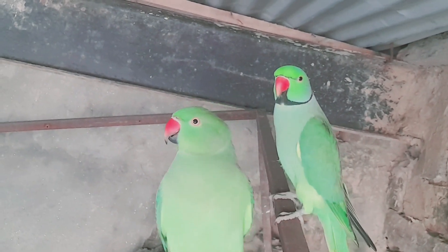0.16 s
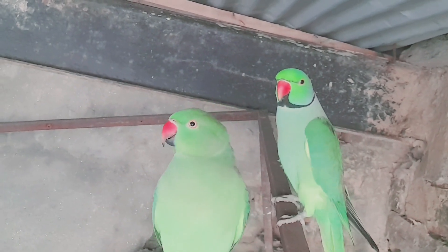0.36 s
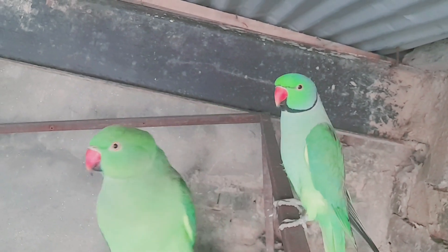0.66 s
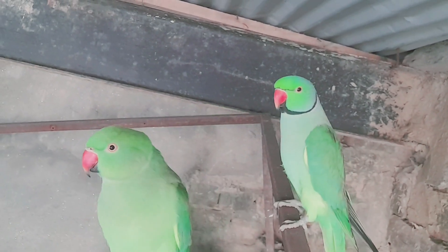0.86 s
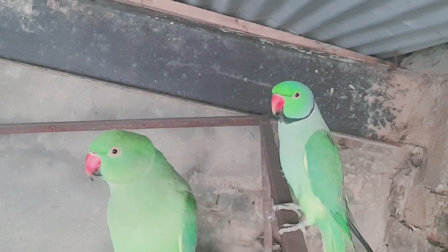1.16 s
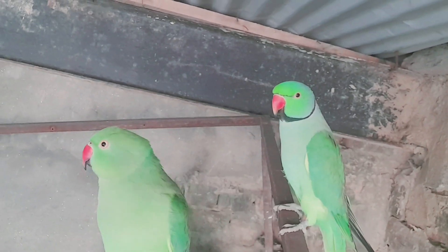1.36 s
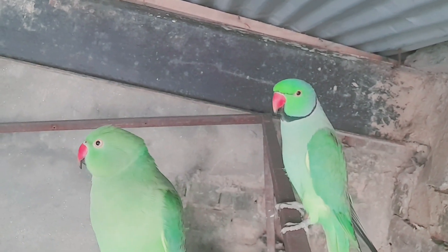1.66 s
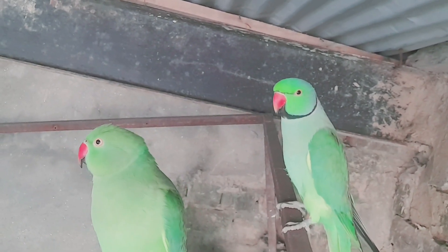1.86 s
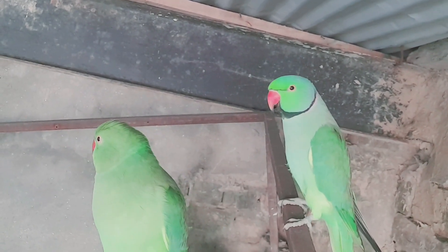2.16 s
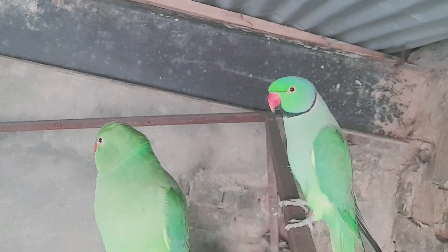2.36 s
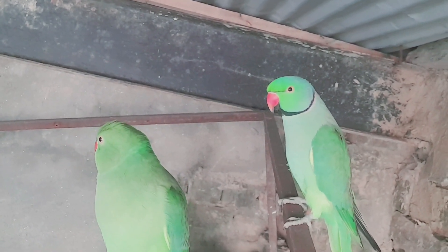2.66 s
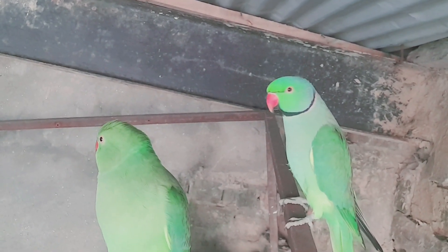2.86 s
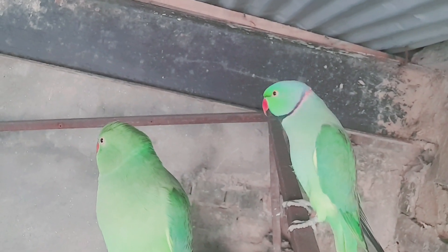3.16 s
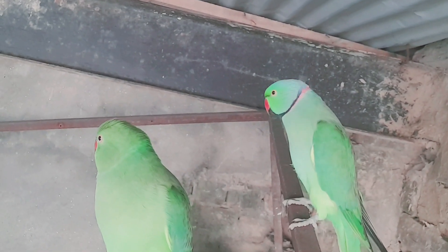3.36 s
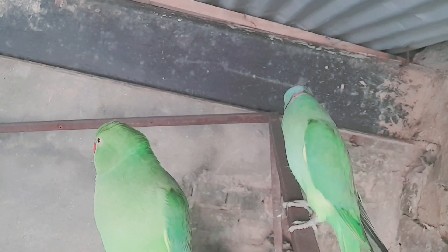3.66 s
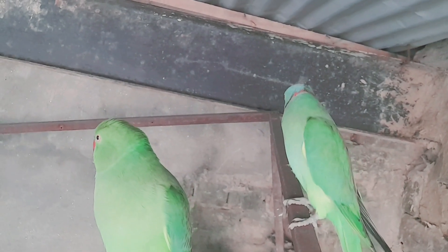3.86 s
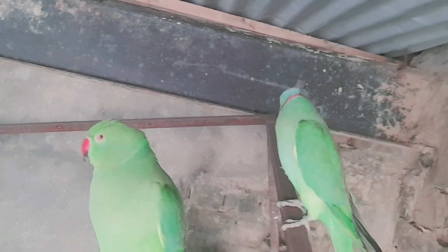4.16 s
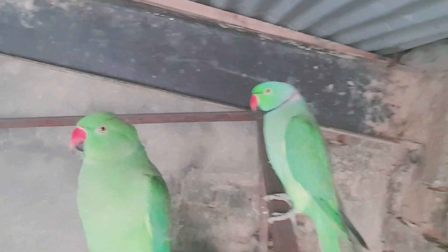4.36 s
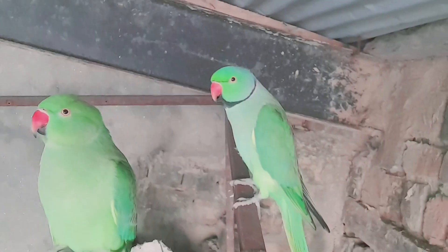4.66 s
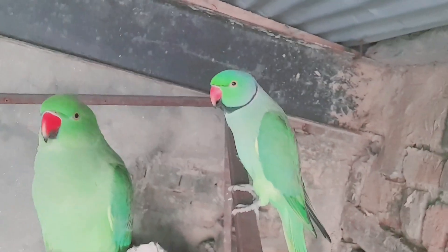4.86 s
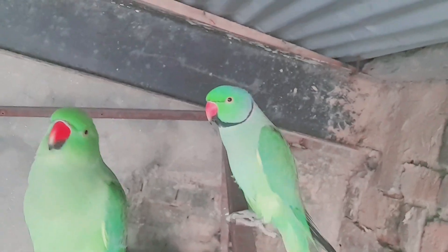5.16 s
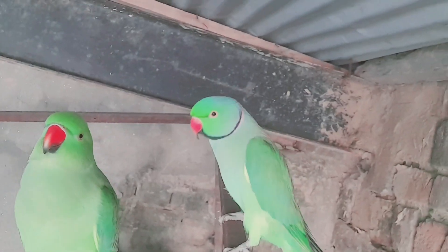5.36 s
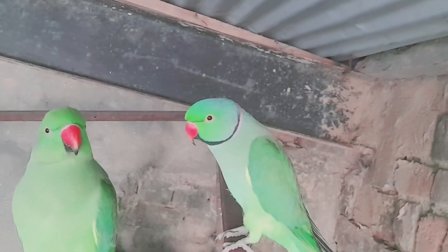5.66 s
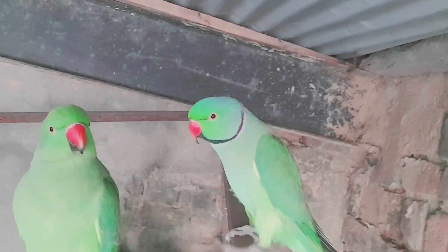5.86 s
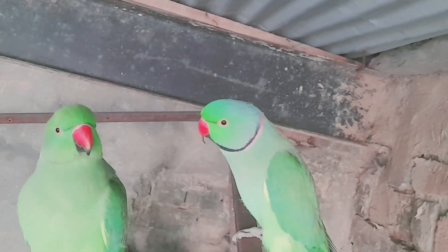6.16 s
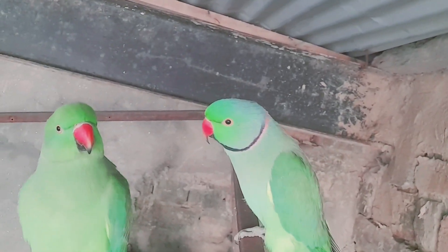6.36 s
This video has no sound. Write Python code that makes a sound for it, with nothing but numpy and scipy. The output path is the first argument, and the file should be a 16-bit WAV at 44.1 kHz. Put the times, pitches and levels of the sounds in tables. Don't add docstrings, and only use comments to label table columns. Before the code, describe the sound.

Two parakeets call in a brick enclosure: piped chirps, a raspy growl, a rising squawk breaking into piercing whistles, then swooping whistles over faint rumble.

```python
import sys
import numpy as np
from scipy import signal
from scipy.fft import rfft, irfft, next_fast_len
from scipy.io import wavfile
from scipy.ndimage import uniform_filter1d, map_coordinates

SR = 44100
rng = np.random.default_rng(int(sys.argv[2]) if len(sys.argv) > 2 else 0)


def field_ratio(decibels):
    return 10 ** (np.asarray(decibels, dtype=float) / 20)


def transcribe(signal):
    frames = np.atleast_2d(signal).T
    limited = np.clip(frames, -1, 1)
    pcm = np.round(limited * 32767).astype(np.int16)
    wavfile.write(sys.argv[1], SR, pcm)


N = 286650


def unit(x):
    return x / np.sqrt(np.mean(x ** 2) + 1e-20)


def along(points, hz):
    f, v = np.transpose(points)
    return np.interp(np.log(hz + 1), np.log(f + 1), v)


def filtered(x, response):
    m = next_fast_len(N + 8192)
    return irfft(rfft(x, m) * response(np.fft.rfftfreq(m, 1 / SR)), m)[..., :N]


def noise(spectrum):
    return unit(filtered(rng.standard_normal(N), lambda hz: field_ratio(along(spectrum, hz))))


def patchy(x, depth_db):
    z = signal.stft(x, nperseg=256)[2]
    field = uniform_filter1d(rng.standard_normal(z.shape), size=5, axis=0)
    field = uniform_filter1d(field, size=10, axis=1)
    return unit(signal.istft(z * field_ratio(depth_db * unit(field)), nperseg=256)[1][:N])


def wobble(n, rate):
    knots = rng.standard_normal(int(n * rate / SR) + 4)
    return map_coordinates(knots, [np.arange(n) * rate / SR])


def span(rows, fade):
    s, *cols = np.transpose(rows)
    at = np.arange(max(0, round(s[0] * SR)), min(N, round(s[-1] * SR)))
    t = at / SR
    since_start = t - s[0] + (s[0] == 0)
    gate = np.clip(np.minimum(since_start, s[-1] - t) / fade, 0, 1)
    return at, gate, [uniform_filter1d(np.interp(t, s, c), size=700, mode="nearest") for c in cols]


def partials(pitch, levels_db, hoarse):
    phase = 2 * np.pi * np.cumsum(pitch) / SR + hoarse * wobble(len(pitch), 420)
    return sum(np.sqrt(2) * field_ratio(db) * (k * pitch < 15900) * np.sin(k * phase + k * k)
               for k, db in enumerate(levels_db, 1))


def notes(rows, shape):
    return [[(s + share * length, top + drop * (end - top), db + first_db, db + second_db, breath_db)
             for share, drop, first_db, second_db, breath_db in shape]
            for s, length, top, end, db in rows]


# [t/s, level/dB]
RUMBLE = [(0.0, -65), (.55, -65), (1.08, -68.5), (1.34, -75.5), (1.72, -69.5), (2.0, -73), (2.33, -62),
          (2.66, -69.5), (2.9, -56.5), (3.33, -67), (3.8, -68.5), (4.18, -74), (4.34, -61.5), (4.5, -68.5),
          (5.1, -60.5), (5.7, -68.5), (6.35, -69.5), (6.5, -60.5)]
# [f/Hz, level/dB per Hz]
AIR = [(20, -34), (45, -8), (100, 1), (170, -15), (320, -15.5), (600, -24), (1200, -35.5), (2500, -37.5),
       (5000, -43.5), (9000, -40.5), (15600, -57)]
# [f/Hz, likeness]
AIR_ALIKE = [(60, 0.49), (240, 0.7), (950, 0.69), (3770, 0.77), (15000, 0.1)]


def background():
    turn = lambda hz: np.arccos(np.clip(along(AIR_ALIKE, hz), -1, 1)) / 2
    pair = [noise(AIR), noise(AIR)]
    mid, side = filtered(pair, lambda hz: np.array([np.cos(turn(hz)), np.sin(turn(hz))]))
    level_db = np.interp(np.arange(N) / SR, *np.transpose(RUMBLE)) + 2.5 * wobble(N, 11)
    return field_ratio(level_db + 0.5) * np.array([mid + side, mid - side]) * field_ratio([[-2.5], [2.1]])


# [f/Hz, t/s]
WALLS = [(300, 0.21), (2500, 0.2), (6000, 0.22), (14000, 0.17)]
LATE_DB, LATE_T60_S = -32, 0.58


def walls(x):
    hz, t, z = signal.stft(rng.standard_normal((2, SR * 3 // 5)), SR, nperseg=256)
    decay = field_ratio(-60 * t / along(WALLS, hz)[:, None]) + field_ratio(LATE_DB - 60 * t / LATE_T60_S)
    tail = signal.istft(z * decay, SR, nperseg=256)[1]
    tail = tail / np.linalg.norm(tail[0])
    delayed = np.pad(x, (150, 0))[None]
    return signal.fftconvolve(delayed, tail, axes=1)[:, :N] * field_ratio([[-3.5], [2.5]])


# [f/Hz, level/dB]
PORT_DB = [(60, -10), (180, -7.5), (550, -8), (1650, -13), (4970, -18.5), (15000, -11.5)]
# [f/Hz, phase/rad]
PORT_RAD = [(0, -0.5), (2580, 3.5), (3100, 8.5), (8350, 19), (9130, 8), (15200, 28)]


def ports(x, shift_db, turn):
    half = lambda hz: (field_ratio((along(PORT_DB, hz) + shift_db) / 2)
                       * np.exp(.5j * turn * along(PORT_RAD, hz)))
    return filtered(np.array([x, x]), lambda hz: np.array([half(hz), 1 / half(hz)]))


# [t/s, length/s, first f/Hz, last f/Hz, level/dB, loss/dB, hoarseness/rad]
OUTSIDE = [(0, 0.019, 1900, 1890, -42, -2, .4), (0.453, 0.071, 2080, 1158, -53, 2, 0.54),
           (1.202, 0.14, 798, 770, -74.5, 9, 0.48), (1.304, 0.13, 7530, 7390, -89, -3, 0.43),
           (4.44, 0.13, 800, 765, -73.5, 7.5, 0.87), (4.49, 0.09, 2770, 2600, -57, -9, 0.26),
           (5.21, 0.042, 3300, 3220, -42, 1, .3), (5.51, 0.34, 875, 830, -80, 11, .7),
           (5.6, .16, 2100, 2090, -95, 9, .8), (5.66, 0.42, 2880, 2930, -92, 11, .6),
           (6.103, 0.083, 2080, 2280, -68, 1, 0.3), (6.125, 0.24, 640, 570, -76, 9, .9),
           (6.17, 0.14, 1800, 1720, -81.5, 9, 1.3), (6.2, 0.21, 1990, 1900, -90, 0.5, 1.3),
           (6.408, 0.07, 1010, 980, -82, -2.5, 0.41)]


def outside():
    out = np.zeros(N)
    for s, length, first_hz, last_hz, db, loss_db, hoarse in OUTSIDE:
        rows = [(s, first_hz, db), (s + length, last_hz, db - loss_db)]
        at, gate, (pitch, level_db) = span(rows, fade=0.0055)
        out[at] += gate * partials(pitch, [level_db + 5.5 * wobble(len(at), 30)], hoarse)
    return out


# [t/s, peak level/dB, f/Hz]
TAPS = [
    (0.061, -39.5, 740),
    (0.262, -41, 733),
    (0.467, -44, 725),
    (0.671, -48, 720),
]


def taps():
    out, t = np.zeros(N), np.arange(3000) / SR
    envelope = (1 - np.exp(-t / 0.0038)) * field_ratio(-60 * t / 0.021)
    for s, db, hz in TAPS:
        out[round(s * SR):][:len(t)] += field_ratio(db + 26) * envelope * np.sin(2 * np.pi * hz * t)
    return out


# [t/s, level/dB]
THUMP = (2.715, -31)
# [f/Hz, level/dB, time to fall 60 dB t/s]
PANEL = [(66.5, -1.5, 1), (91, -6, 0.99), (167, 0, 0.55), (245, -16.5, 0.26), (323, -24, 0.68)]


def thump():
    start_s, level_db = THUMP
    t = np.clip(np.arange(N) / SR - start_s, 0, None)
    ring = sum(field_ratio(db - 60 * t / t60 + 3.3 * wobble(N, 22)) * np.sin(2 * np.pi * hz * t)
               for hz, db, t60 in PANEL)
    return field_ratio(level_db) * (1 - np.exp(-(t / 0.0028) ** 2)) * ring


# [t/s, level/dB]
HOPS = [
    (4.33, -64),
    (5.51, -48),
    (5.585, -58),
]


def hops():
    t = np.arange(N) / SR
    push = sum(field_ratio(db - 60 * np.clip(t - s, 0, 1) / 0.14) * np.clip((t - s) / 0.0084, 0, 1)
               for s, db in HOPS)
    return push * noise([(40, -18), (150, 7), (400, -14.5), (1000, -31), (3000, -56.5)])


# [t/s, length/s, level/dB]
AIR_SWELLS = [(0.132, 0.205, -49.5), (0.429, 0.19, -46.5), (0.716, 0.14, -50), (1.722, 0.077, -47.5),
              (2.262, 0.085, -50), (3.525, .09, -49), (4.074, 0.06, -65), (4.431, .07, -62),
              (5.296, 0.2, -50.5), (6.406, .2, -73)]
# [f/Hz, level/dB per Hz]
BREATH = [(400, -49), (800, -26.5), (1500, -26.5), (2700, -11), (5000, -19), (7500, -19), (9300, -30.5),
          (12000, -30), (14000, -34.5), (15600, -41.5)]


def air_swells():
    t = np.arange(N) / SR
    swell = sum(field_ratio(db) * np.sin(np.pi * np.clip((t - s) / length, 0, 1)) for s, length, db in AIR_SWELLS)
    return swell * patchy(noise(BREATH), depth_db=10.5)


# [t/s, length/s, level/dB]
WHEEZE = [
    (4.77, .24, -57.5),
    (5.07, .2, -51.5),
    (5.2, 0.27, -58),
]
# [f/Hz, level/dB per Hz]
WHEEZE_COLOUR = [(3000, -20), (6000, -3.5), (9000, 1.5), (12000, -4.5), (15600, -9.5)]


def wheeze():
    t = np.arange(N) / SR
    swell = sum(field_ratio(db) * np.sin(np.pi * np.clip((t - s) / length, 0, 1) ** .6)
                for s, length, db in WHEEZE)
    return swell * patchy(noise(WHEEZE_COLOUR), depth_db=-1.5)


# [t/s, peak level/dB, scrape level/dB, knock level/dB]
CLAWS = [(1.952, -43, 0.5, -27), (2.4926, -37, -10, -32.5), (2.5422, -39, -13.5, -15.5),
         (3.0588, -22, -11.5, -17.5), (3.885, -36, -5, -56), (4.083, -36.5, -2, -52),
         (4.298, -29.5, -29.5, -24.5), (4.4373, -46.5, -14, -24), (6.4398, -68.5, 8.5, -12),
         (6.4642, -59, 3.5, -2.5)]
# [f/Hz, level/dB per Hz]
PERCH = [(500, -25.5), (1400, -22), (2050, 1.5), (2600, -12), (4000, -24), (6000, -34.5)]
# [f/Hz, level/dB per Hz]
SCRAPE = [(2500, -48.5), (4500, -14), (7000, -0.5), (9000, -0.5), (15000, -30.5)]


def claws():
    out, t = np.zeros(N + SR), np.arange(3000) / SR
    perch, scrape = noise(PERCH), noise(SCRAPE)
    for s, db, scrape_db, knock_db in CLAWS:
        at = round(s * SR)
        piece = slice(at - len(t), at)
        tick = field_ratio(-60 * t / 0.14) * perch[piece] + field_ratio(scrape_db - 60 * t / 0.07) * scrape[piece]
        knock = field_ratio(knock_db + 9.5) * (1 - t / 0.00021) * np.exp(-t / .00015)
        out[at:][:len(t)] += field_ratio(db - 11.0) * (tick * (1 - np.exp(-t / 0.0006)) + knock)
    return out[:N]


# [t/s, level/dB]
CREAKS = [(2.5634, -48.5), (2.5825, -48.5), (2.602, -46), (2.63, -45.5)]
# [t/s, level/dB, width/s]
SNAP = (3.0585, -18, .00007)
# [f/Hz, level/dB per Hz]
SCREECH = [(530, -34.5), (900, -23.5), (1050, -29), (2310, -7.5), (2510, -4), (3590, -5.5), (5320, -12.5),
           (8670, -20.5), (12700, -35.5), (15600, -47)]


def small_noises():
    t, air = np.arange(N) / SR, noise(SCREECH)
    puffs = sum(field_ratio(db - 60 * np.clip(t - s, 0, 1) / 0.17) * np.clip((t - s) / 0.0016, 0, 1)
                for s, db in CREAKS)
    snap_s, snap_db, width_s = SNAP
    return puffs * air - field_ratio(snap_db) * np.exp(-((t - snap_s) / width_s) ** 2)


PIPES = [(-.04, 0.12, 3045, 2656, -30.5), (.235, 0.11, 3352, 2923, -30), (3.52, .1, 3497, 3084, -31.5)]
STEPS = [(.52, .095, 3646, 3220, -24.5), (.8, 0.084, 3586, 3233, -24)]
FALLS = [(.08, 0.056, 1878, 1257, -41), (.33, 0.096, 2340, 1626, -37.5), (.6, 0.091, 2436, 1760, -34),
         (.878, 0.068, 2430, 2180, -35), (3.61, 0.084, 2350, 1700, -34), (4.3, 0.056, 2303, 1816, -41.5),
         (4.6, 0.079, 2166, 1687, -40.5)]
CHIPS = [(.24, 0.015, 2480, 2500, -48.5), (0.521, 0.015, 2474, 2410, -39),
         (0.804, 0.019, 2460, 2470, -40.5)]
SWOOPS = [(4.772, .18, 2702, 1939, -34), (5.075, .2, 2712, 1665, -32.5)]
# [share of length, share of drop, 1st partial level/dB, 2nd partial level/dB, breath under voice level/dB]
PIPE_SHAPE = [(0, 0.3, -2, -43, -2.5), (.35, 0.077, 4, -30, -28.5), (.7, 0.42, -3.5, -22, -29),
              (1, 1, 3, -20.5, -7.5)]
STEP_SHAPE = [(0, .6, -16, -43.5, 9), (.3, 0.11, -16, -44.5, -16), (0.618, 0.19, -9.5, -27.5, -22),
              (.78, 0.86, -1.5, -25.5, -19), (1, 0.95, -7.5, -21.5, -27.5)]
FALL_SHAPE = [(0, 0.0043, -5, 7.5, -13.5), (0.398, .12, -12, -5.5, -4), (1.002, 1, -14, -1, 3)]
SWOOP_SHAPE = [(0, 0.85, -27, 9.5, 14.5), (.09, 0.026, -1.5, -13, -15.5), (.45, 0.06, -1, -2, -25),
               (.7, .38, -8, 3.5, -24), (0.998, 1, -14.5, 1, -6)]
# [t/s, f/Hz, level/dB]
SONG = [
    [(4.75, 2087, -38), (4.8, 2110, -39.5), (4.854, 2147, -35.5), (4.89, 2230, -35.5), (4.914, 2292, -26),
     (4.968, 2289, -29.5), (5.005, 2280, -42.5)],
    [(4.995, 2276, -40), (5.086, 2521, -33), (5.15, 2681, -33.5), (5.22, 2590, -35), (5.288, 2477, -36.5),
     (5.334, 2384, -46.5), (5.384, 2493, -36), (5.42, 2808, -35.5), (5.445, 2800, -65.5)],
    [(4.16, 1400, -84.5), (4.2, 1650, -51.5), (4.24, 2450, -52.5), (4.255, 2900, -39), (4.285, 3260, -34.5),
     (4.31, 3230, -38.5), (4.38, 3202, -52.5)],
    [(4.452, 3200, -48), (4.47, 3200, -38), (4.52, 3040, -40.5), (4.57, 2920, -30), (4.61, 2870, -46),
     (4.72, 2900, -55)],
]
# [2nd partial level/dB, breath under voice level/dB]
SONG_VOICE = [(-15.5, -13.5), (-31, -14), (-24.5, -14), (-20.5, -20.5)]


def far_bird():
    out = np.zeros(N)
    air = patchy(noise(SCREECH), depth_db=3.5) * field_ratio(2 * wobble(N, 120) + wobble(N, 30))
    song = [[(s, hz, db, db + second_db, breath_db) for s, hz, db in call]
            for call, (second_db, breath_db) in zip(SONG, SONG_VOICE)]
    clear = notes(PIPES, PIPE_SHAPE) + notes(STEPS, STEP_SHAPE) + song
    rough = notes(FALLS + CHIPS, FALL_SHAPE) + notes(SWOOPS, SWOOP_SHAPE)
    kinds = ((clear, .12, .12, (-8, -12, -20)), (rough, .2, .55, (-20, -25, -38)))
    for calls, first_hoarse, last_hoarse, over_db in kinds:
        for call in calls:
            fade = min(.016, (call[-1][0] - call[0][0]) / 4)
            at, gate, (pitch, first_db, second_db, breath_db) = span(call, fade)
            levels_db = [first_db, second_db] + [second_db + db for db in over_db]
            voice = partials(pitch, levels_db, np.linspace(first_hoarse, last_hoarse, len(at)))
            breath = field_ratio(np.maximum(first_db, second_db) + breath_db) * gate * air[at]
            throb = field_ratio(3.0 * wobble(len(at), 70))
            out[at] += gate * throb * (voice + breath)
    return out


# [t/s, level/dB, bottom f/Hz, top f/Hz]
GROWL = [(.865, -41.5, 750, 1182), (.92, -37.5, 794, 1343), (.955, -24.5, 835, 1413),
         (1.0, -21, 850.6, 1413), (1.06, -20.5, 939, 1455), (1.15, -23, 1004, 1494),
         (1.175, -36.5, 1097, 1503)]
# [f/Hz, level/dB per Hz]
RASP = [(500, -23.5), (1000, 0.5), (3000, 6.5), (4500, -2), (7000, -6.5), (8500, -47.5), (12000, -16.5),
        (15600, -19.5)]
SWINGS_HZ = 118
DWELL = 1.25
THROB_DB, THROB_FROM_S, THROB_RISE_S = 11, 0.96, 0.041


def growl():
    out = np.zeros(N)
    at, gate, (level_db, bottom, top) = span(GROWL, fade=0.015)
    throb_db = -2.5 + (THROB_DB - 3.0) * np.clip((at / SR - THROB_FROM_S) / THROB_RISE_S, 0, 1)
    turns = np.cumsum(SWINGS_HZ * (1 + .018 * wobble(len(at), 30))) / SR
    swing = np.tanh(DWELL * (1 - np.cos(2 * np.pi * turns))) / np.tanh(2 * DWELL)
    levels_db = [db + 0.47 * wobble(len(at), 110)
                 for db in (-13.5, -2.0, -22.0, -24.5, -33, -44.0, -49.0, -35.0, -33.5)]
    tone = partials(bottom + (top - bottom) * swing, levels_db, .15)
    puff = field_ratio(-12) * noise(RASP)[at]
    swing_db = 2 * throb_db * (np.sin(np.pi * turns) ** 2 - 0.5955)
    out[at] = gate * field_ratio(level_db + swing_db) * (tone + puff)
    return out


# [t/s, f/Hz, effort level/dB]
ARCS = [
    [(1.48, 806, -64), (1.526, 769, -56), (1.558, 763, -44.5), (1.63, 807.4, -32.5), (1.698, 839, -29.5),
     (1.728, 818.3, -30.5), (1.74, 762, -32.5), (1.755, 553, -50.5), (1.77, 395, -49)],
    [(2.02, 1457, -49), (2.06, 1386, -44), (2.09, 1520, -40.5), (2.14, 1983, -30), (2.18, 2120, -26),
     (2.2, 2091, -25), (2.214, 1900, -31.5)],
    [(2.212, 1815, -22.5), (2.272, 1215, -28), (2.3, 591, -49)],
    [(3.06, 643, -50), (3.085, 803, -42.5), (3.11, 1094, -41), (3.16, 1195, -38.5), (3.2, 1220, -29.5),
     (3.26, 1237, -27), (3.305, 1180, -30), (3.318, 760, -27.5), (3.34, 612, -43)],
]
# [t/s, f/Hz, effort level/dB]
RISES = [
    [(2.55, 495.7, -65), (2.64, 630, -43), (2.7, 678, -33), (2.762, 740.8, -31.5), (2.792, 845.6, -30),
     (2.862, 853.5, -29), (2.893, 1050, -28), (2.942, 1297, -26), (2.984, 1805, -24.5), (3.0, 1800, -29)],
    [(4.14, 736, -66), (4.17, 758, -57), (4.21, 780, -56)],
]
# [t/s, f/Hz, effort level/dB]
HIGH = [
    [(2.993, 2426, -14.5), (3.014, 2430, -31), (3.03, 2479, -19), (3.048, 2505, -33), (3.09, 2545, -36)],
    [(3.325, 2415, -26.5), (3.395, 2463, -18), (3.439, 2400, -25.5), (3.465, 2389, -18.5)],
    [(3.45, 1844, -30.5), (3.508, 1787, -26), (3.534, 1701, -29), (3.56, 1064, -30.5),
     (3.595, 436.6, -43.5)],
]
# [2nd
# partial level/dB, 3rd partial level/dB, upper partials level/dB, gain per upper partial/dB, growth of 3rd and
# upper partials/dB per dB of effort]
CLOSURE = [(-1, -9, 5, 1, 0.6), (-13, 5, -11, 1.5, 1.66), (-7, -5.5, -5, 3, 0.5), (-6, -6, -5, 1.35, 0.66),
           (-2.5, -1.5, -5, 1.5, 0.46), (3, -2.5, 6.5, 2, 2), (-6.5, -14.5, -10.5, -1, 0),
           (0.5, -9, -11, 4.5, 0.23), (9.5, -4.5, -6, 3, 0)]
# [gain of partials above the throat level/dB, breath level/dB]
SHEEN = [(18, 3), (12, 5.5), (-18, 1), (-10.5, 3.5), (-4.5, 4.5), (0, -2), (-10, 3.5), (8.5, -3.5),
         (-22, -1)]
HALVES_DB = [-45.5, -52.5, -60.5, -52.5, -41, -40, -60.5, -49, -60]
SECOND_GROWS = [0, 0.8, 0, 0.01, 0.06, 0, 0, 0.02, 0.2]
# [t/s, flutter depth 0-1, hoarseness/rad]
STRAIN = [(1.6, 0, .02), (1.72, 0, .045), (1.75, 0, .2), (2.02, 0, .01), (2.2, 0, .035), (2.26, 0, .075),
          (2.3, 0, .2), (2.55, .6, .24), (2.7, .5, .2), (2.9, .45, .2), (2.95, .25, .14), (3.0, 0, .11),
          (3.09, 0, .05), (3.16, .05, .02), (3.2, .85, .14), (3.31, .85, .17), (3.325, .3, .2),
          (3.34, 0, .13), (3.52, 0, .12), (3.55, .5, .18), (4.14, .4, .18)]
# [f/Hz, level/dB]
MOUTH = [(500, -17.5), (900, -16.5), (1500, -10.5), (2000, 0.5), (2500, -0.5), (3000, -1), (3600, -8),
         (4300, -13.5), (5400, -10.5), (7500, -6.5)]
# [f/Hz, level/dB]
GAPE = [(500, -18.5), (900, -14), (1300, -17), (1750, -10.5), (2050, 2.5), (2550, 3), (3000, -6),
        (3600, -5), (4300, -15.5), (5400, -18.5)]
# [f/Hz, level under voice/dB]
THROAT = [(1500, 25), (2500, 7.5), (3300, -7), (4200, -6), (5000, -3.5), (5800, -12.5), (6600, -4),
          (7600, -13.5), (8800, -21), (12000, -31), (15500, -33)]
# [t/s, f/Hz, level/dB]
WHISTLE = [(4.563, 1435, -51), (4.637, 1445, -40), (4.743, 1131, -36.5), (4.765, 1035, -32.5),
           (4.833, 1041, -35), (4.875, 1235, -31), (4.915, 1390, -30), (4.978, 1780, -16.5),
           (4.995, 1700, -46.5)]
SHEEN_HZ = 8000
BROKEN_DB = 8.0


def near_bird():
    out, air = np.zeros(N), patchy(noise(BREATH), depth_db=2.0)
    strain_s, *strain = np.transpose(STRAIN)
    for call, closure, (sheen_db, air_db), half_db, second_grows in zip(
            ARCS + RISES + HIGH, CLOSURE, SHEEN, HALVES_DB, SECOND_GROWS):
        second_db, third_db, rich_db, beak_db, third_grows = closure
        at, gate, (pitch, effort_db) = span(call, fade=.005)
        flutter, hoarse = (np.interp(at / SR, strain_s, c) for c in strain)
        beat = 2 * np.pi * np.cumsum(120 + 4 * wobble(len(at), 40)) / SR
        blow_db = effort_db - effort_db.max()
        growth_db = third_grows * blow_db
        long_squawk = call is RISES[0]

        closing_db = (0, second_db + second_grows * blow_db, third_db + growth_db)
        low_db = [along(GAPE if long_squawk else MOUTH, k * pitch) + db
                  for k, db in enumerate(closing_db, 1)]
        total_db = 10 * np.log10(sum(field_ratio(db) ** 2 for db in low_db))
        low_db = [effort_db + db - total_db + BROKEN_DB * long_squawk * flutter * wobble(len(at), 45)
                  for db in low_db]

        upper_db = []
        for k in range(4, 22):
            gloss_db = sheen_db * np.clip(2 * (k * pitch / SHEEN_HZ - 1), 0, 1)
            slope_db = (beak_db + 0.22 * (effort_db + 19)) * (k - 3)
            throat_db = along(THROAT, k * pitch)
            upper_db.append(effort_db + rich_db + growth_db + throat_db + gloss_db + slope_db)

        fluttered = pitch * (1 + .12 * flutter * np.cos(beat))
        voice = partials(fluttered, low_db + upper_db, hoarse * (1.6 - .4 * flutter))
        half_depth = np.minimum(field_ratio(half_db - 1.1 * blow_db), .3)
        voice = voice * (1 + half_depth * np.cos(np.pi * np.cumsum(pitch) / SR))
        breath = field_ratio(effort_db + air_db - 33 + 105 * hoarse) * air[at]
        beat_depth = flutter * np.clip(0.22 + 0.4 * wobble(len(at), 50), 0, 1)
        uneven_db = (1.5 + 18 * np.minimum(hoarse, .1) * (0.5 - flutter)) * wobble(len(at), 70)
        out[at] += gate * (1 + beat_depth * np.sin(beat)) * field_ratio(uneven_db) * (voice + breath)

    at, gate, (pitch, level_db) = span(WHISTLE, fade=0.0027)
    strain_db = 2.4 * np.minimum(level_db + 23, 0)
    overtones_db = [level_db + strain_db + db for db in (-16.0, -20.0, -18.0, -32.0, -52.0)]
    out[at] += gate * partials(pitch, [level_db] + overtones_db, 0.0066)
    return out


# [f/Hz, level/dB]
BEHIND = [(1500, 5.5), (5000, 7), (12000, 0)]


def scene():
    near = field_ratio(4.5) * (near_bird() + growl()) + claws() + small_noises() + taps()
    far = far_bird() + outside() + air_swells() + wheeze()
    direct = ports(near, shift_db=4.0, turn=0.43) + field_ratio(1.5) * ports(far, shift_db=10.0, turn=0.33)
    near_to_walls = filtered(near, lambda hz: field_ratio(along(BEHIND, hz) - 11.5))
    echo = walls(near_to_walls) + walls(field_ratio(5.5) * far)
    panel = (thump() + hops()) * field_ratio([[-2.2], [2.1]])
    return direct + echo + panel + background()


def roll_off(x):
    return signal.sosfilt(signal.butter(12, 15710, fs=SR, output="sos"), x)


def record(dry):
    held = dry / (1 + np.abs(dry / .97) ** 8) ** (1 / 8)
    return roll_off(held)


dry = scene()
out = record(dry)
transcribe(out)
```